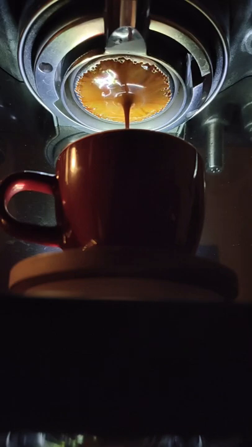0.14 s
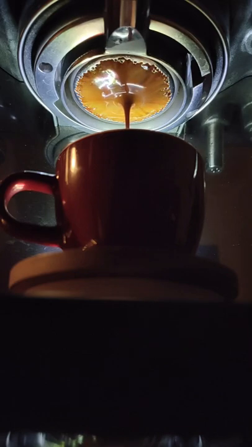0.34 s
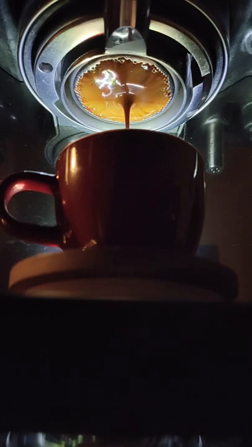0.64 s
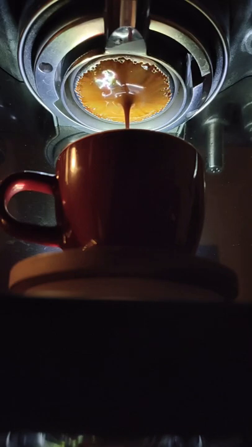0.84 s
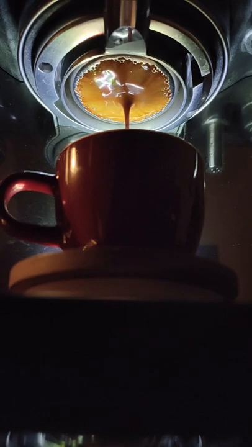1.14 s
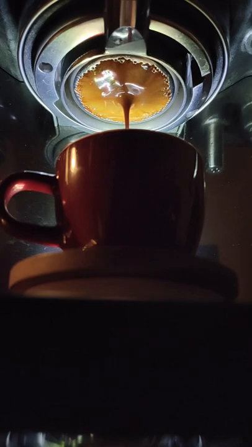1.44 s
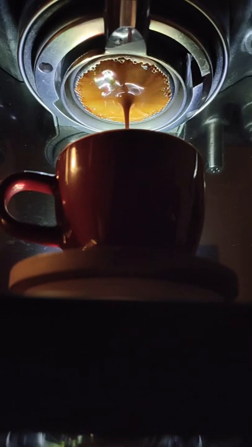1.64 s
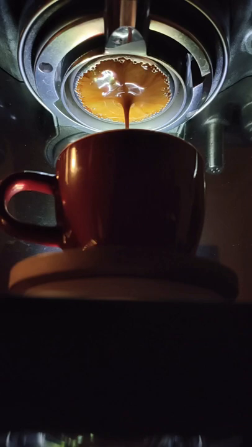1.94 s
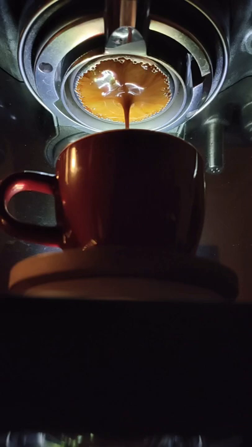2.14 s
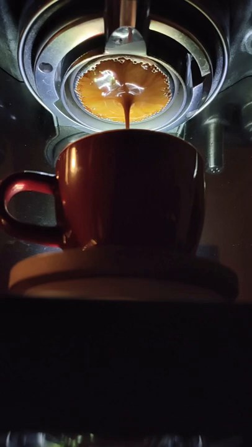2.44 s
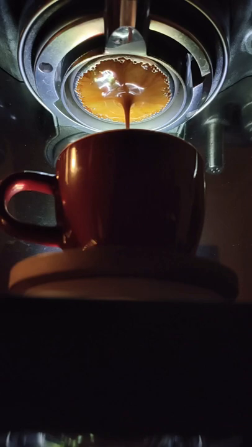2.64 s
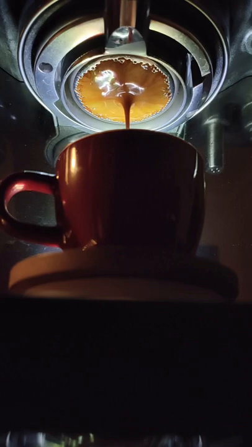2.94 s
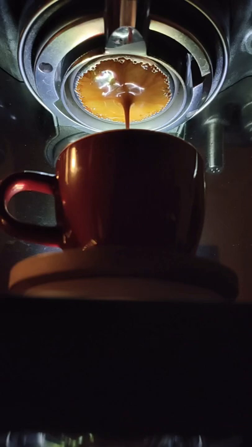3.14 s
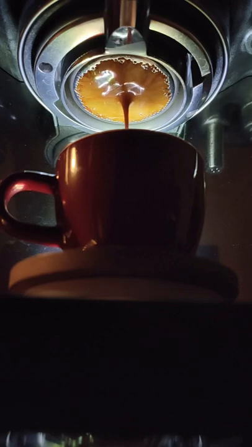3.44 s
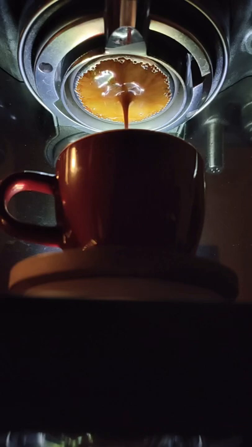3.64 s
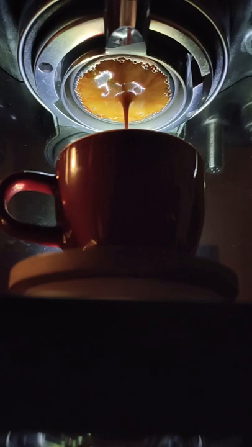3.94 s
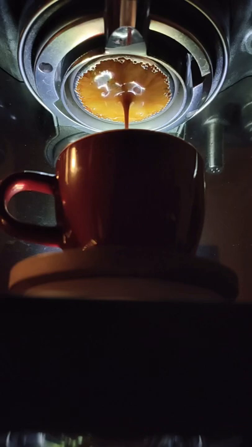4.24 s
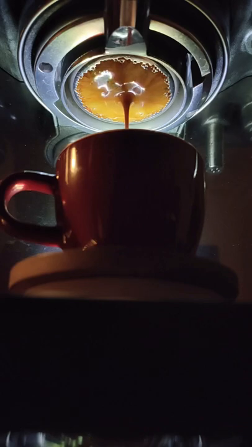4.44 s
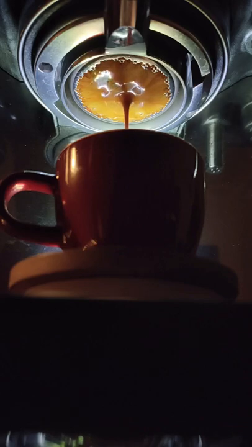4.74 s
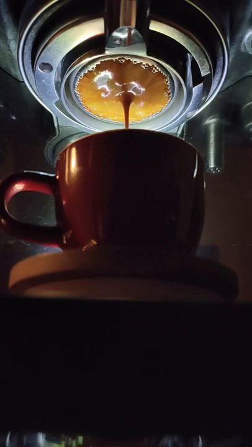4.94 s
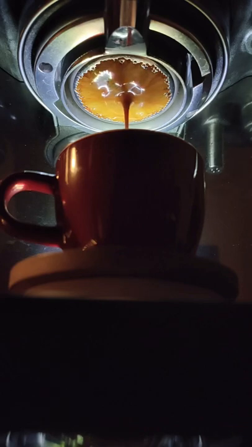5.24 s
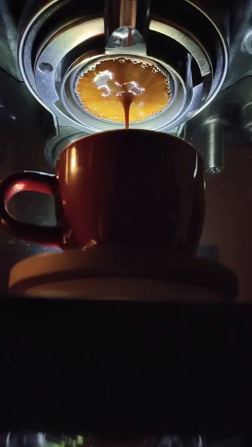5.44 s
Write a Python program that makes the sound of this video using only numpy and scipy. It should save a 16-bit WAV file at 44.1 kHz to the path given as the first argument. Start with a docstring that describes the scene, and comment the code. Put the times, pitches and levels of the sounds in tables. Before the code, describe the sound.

For about 5.6 seconds an espresso machine's vibrating pump runs continuously, heard close by in a kitchen through one microphone. Its hum is low and buzzy, about sixty strokes a second, with strong overtones up to several hundred hertz that waver slightly. Another motor's steady tone near 470 hertz beats quickly against it. Tiny valve ticks repeat every stroke, fusing into a metallic rattle, with bright hiss ringing mostly around two to four kilohertz. The hiss flickers, with brief surges near 0.8 and 1.7 seconds, smaller ones around 2.8 to 3.05, and a lift near 5.1. Sharp metallic knocks spit at about 3.4, 3.5 and 4.9 seconds. A thin coffee stream burbles into the cup, faint at first, swelling slightly near 2.1, then clearly growing from 3 seconds to a peak around 5.2. Soft casing and room rumble lies beneath; the pump never stops.

```python
"""A vibrating pump drives water through coffee in an espresso machine, heard close by in a kitchen.
Its piston strokes at mains rate: the casing hums in clean overtones, stops and valves tick at each stroke,
and noise bursts and steady hiss ring the metal body as water is forced through. Three lone knocks spit.
A stream of dense random splashes rings the air in the cup; a slower motor's steady tones drone nearby
over shaped noise, the rumble of casing and room. One microphone hears it all."""
import sys
import numpy as np
from scipy import signal
from scipy.fft import rfft, irfft, next_fast_len
from scipy.io import wavfile

SR = 44100
rng = np.random.default_rng(int(sys.argv[2]) if len(sys.argv) > 2 else 0)


def generate_wav(sig):
    """Save sig (samples, or channels by samples) to the path in sys.argv[1] as 16-bit PCM at SR."""
    pcm = np.round(np.clip(np.atleast_2d(sig).T, -1, 1) * 32767).astype(np.int16)
    wavfile.write(sys.argv[1], SR, pcm)


def invert_db(level):
    """Linear amplitude ratio for a level in decibels (20 dB per decade), elementwise."""
    return 10 ** (np.asarray(level, dtype=float) / 20)


N = 246959

MAINS_HZ = 59.992
# metal body rung by ticks, hiss and spits: centre_hz, width_hz, relative level_db
BODY_MODES = [(840, 145, -13), (1400, 205, -7.5), (1910, 360, -4), (2378, 210, -0.5), (2595, 157, -1),
              (3126, 230, -12.5), (3345, 86, -5.5), (3620, 59, -4), (3950, 184, -13), (5255, 304, -13),
              (6220, 460, -11.5), (7860, 390, -17), (8500, 230, -13), (9520, 420, -10), (10420, 780, -15.5),
              (12400, 1700, -29), (13900, 370, -25)]


def rms_one(x):
    """Scale to unit rms."""
    return x / np.sqrt(np.mean(x ** 2) + 1e-20)


def in_time(rows):
    """Columns of a curve table, one value per sample."""
    time_s, *columns = np.transpose(rows)
    return [np.interp(np.arange(N) / SR, time_s, column) for column in columns]


def bumps(rows, width_s):
    """Bell-shaped swells in dB at the given times."""
    t = np.arange(N) / SR
    return sum(db * np.exp(-0.5 * ((t - centre_s) / width_s) ** 2) for centre_s, db in rows)


def drift(rate_hz):
    """Slow random wander with spread 1: twice-smoothed noise, one value per 40 samples, joined by lines."""
    pole = np.exp(-80 * np.pi * rate_hz / SR)
    noise = rng.standard_normal(N // 40 + 2002)
    slow = signal.lfilter([1], [1, -2 * pole, pole * pole], noise)[2000:]  # skip the filter's start-up
    return np.interp(np.arange(N) / 40, np.arange(len(slow)), rms_one(slow))


def resonate(x, modes):
    """Parallel two-pole resonances of alternating sign, each wider one dying sooner."""
    out = np.zeros(N)
    for k, (hz, width_hz, db) in enumerate(modes):
        radius = np.exp(-np.pi * width_hz / SR)
        b = (1 - radius * radius) / 2 * np.array([1, 0, -1])
        a = [1, -2 * radius * np.cos(2 * np.pi * hz / SR), radius * radius]
        out += (-1) ** k * invert_db(db) * signal.lfilter(b, a, x)
    return out


def hum(push_ms, smear, lead, waver_db):
    """Overtones of the stroke; the casing smears the low ones in time, and higher ones waver more."""
    # casing hum, 1st to 9th multiple of the stroke rate: first_db, last_db (rms)
    low_overtones = [(-46, -45.5), (-52.5, -51.5), (-44, -42), (-47, -45), (-40.5, -42), (-49, -51.5),
                     (-49.5, -53), (-46.5, -42), (-50.5, -51)]
    # the 10th multiple takes over from the 11th: time_s, tenth_db, eleventh_db (rms)
    handover = [(0, -67, -57.5), (.9, -66, -53.5), (2.4, -59, -55), (3.6, -54.5, -57), (4.4, -50, -71),
                (5.6, -53, -72)]
    # casing buzz, 12th multiple and up: level_db (rms)
    buzz = [-66, -67, -69.5, -73.5, -84, -76.5, -95, -74.5, -72.5, -66, -77.5, -87.5, -70, -72, -72.5, -84,
            -82, -80, -75.5, -77, -82, -82, -94, -85, -75.5, -71.5, -75.5, -81.5, -69, -72.5, -76]
    # the 8th multiple dips as the 10th swells: centre_s, depth_db
    dropouts = [(.5, 20), (1.17, 9), (2.4, 6), (3.2, 6.0)]
    tenth_share = 0.64  # the 10th swells by this share of the depth
    in_step_above = 8  # overtones above this multiple keep in step with the push

    levels = [np.linspace(first, last, N) for first, last in low_overtones]
    levels += in_time(handover) + list(buzz)
    dropout_db = bumps(dropouts, width_s=0.1)
    levels[7] = levels[7] - dropout_db
    levels[9] = levels[9] + tenth_share * dropout_db

    turn = 2 * np.pi * MAINS_HZ * (np.arange(N) / SR - push_ms / 1000)
    out = np.zeros(N)
    for k, db in enumerate(levels, 1):
        loose = np.tanh(k / 10)
        waver = waver_db * loose * drift(1.87)
        phase = k * turn + smear * min(k, in_step_above) ** 2 + lead
        phase = phase + 0.71 * loose * drift(2.6)
        out += invert_db(db + waver) * np.cos(phase)
    return np.sqrt(2) * out


def ticks(jitter_us, uneven_db, dull_hz, burst_ms):
    """Every contact clicks once a stroke, nearly on time; its bright share opens a short gate for the hiss."""
    # contacts within one stroke: delay_ms, relative level_db, brightness (0-1)
    contacts = [(1.25, -3.5, 1), (7.9, -5.5, 0.08), (14.1, -6.5, 0), (14.9, -5, 0.99), (16.55, -7.5, 1)]
    starts_s = np.arange(-1, N / SR * MAINS_HZ) / MAINS_HZ
    sharp, soft = np.zeros(N + 1), np.zeros(N + 1)
    for delay_ms, db, bright in contacts:
        chance = rng.standard_normal((len(starts_s), 2))
        at = (starts_s + delay_ms / 1000 + jitter_us * 1e-6 * chance[:, 0]) * SR
        inside = (at >= 0) & (at < N - 1)
        size = invert_db(db + uneven_db * chance[:, 1])[inside]
        at = at[inside]
        i, share = at.astype(int), np.clip(bright, 0, 1)
        # split each click over two samples to place it between them
        for offset, weight in ((0, 1 - at % 1), (1, at % 1)):
            sharp[i + offset] += share * weight * size
            soft[i + offset] += (1 - share) * weight * size
    sharp, soft = sharp[:N] + 1e-18, soft[:N] + 1e-18
    dulled = signal.sosfilt(signal.butter(2, dull_hz, fs=SR, output="sos"), soft)
    fade = np.exp(-1000 / (burst_ms * SR))
    gate = signal.lfilter([1], [1, -fade], sharp)
    return rms_one(sharp + dulled), gate


def valves(hiss_db):
    """Ticks, spurts of hiss after bright ticks and steady hiss ring the body; the top follows the flow most."""
    clicks, gate = ticks(jitter_us=18, uneven_db=1.5, dull_hz=3000, burst_ms=1.5)
    spurts = rms_one(gate * rng.standard_normal(N))
    # thin jets: no low end
    spurts = signal.sosfilt(signal.butter(2, 6000, "high", fs=SR, output="sos"), spurts)
    steady = rng.standard_normal(N) * invert_db(1.05 * drift(27))
    struck = invert_db(-6.5) * clicks + invert_db(-3.5) * spurts + invert_db(-3) * steady
    rung = rms_one(resonate(struck, BODY_MODES))
    lower = signal.lfilter(*signal.butter(1, 5000, fs=SR), rung)
    upper = rung - lower
    swing_db = hiss_db - np.mean(hiss_db)
    return invert_db(-58.5) * (invert_db(0.28 * swing_db) * lower + invert_db(1.02 * swing_db) * upper)


def flow():
    """The hiss curve in dB: slow changes of flow, short surges and a random flicker."""
    # course of the valve hiss, of which only the swing about its mean is heard: time_s, level_db
    hiss_course = [(0, -64.5), (.9, -66), (1.3, -63.5), (2.3, -66), (2.7, -62.5), (3.6, -61.5), (4.1, -63),
                   (4.95, -62.5), (5.07, -59), (5.6, -62)]
    # short surges, before the valves scale the swing: centre_s, rise_db
    surges = [(.77, 3.5), (1.71, 4), (2.84, 1), (3.05, 1)]
    return in_time(hiss_course)[0] + bumps(surges, width_s=0.025) + 1.17 * drift(5.3)


def spits():
    """Spits of air in the pump: each a lone sharp knock that rings the middle of the body."""
    # knocks: time_s, level_db (before a 29 dB lift and the ringing)
    air_spits = [(3.3757, -44), (3.5029, -46), (4.9202, -42)]
    knocks = np.zeros(N) + 1e-18
    for time_s, db in air_spits:
        knocks[round(time_s * SR)] = invert_db(db + 29)
    return resonate(knocks, BODY_MODES[2:11])


def stream(cup_db):
    """The thin stream lands in dense tiny splashes; small bubbles burble and the air in the cup rings."""
    # air resonances of the cup: centre_hz, width_hz, relative level_db
    cup_modes = [(780, 370, -10.5), (1384, 195, 2.5), (1670, 330, -3.5)]
    sizes = rng.choice([-1, 1], N) * invert_db(2.5 * np.minimum(rng.exponential(1, N), 3))
    splashes = (rng.random(N) < 2500 / SR) * sizes  # about 2500 a second
    burble = np.zeros(N)
    for k, bubble_hz in enumerate(np.geomspace(650, 1900, num=24)):
        shifted = np.roll(splashes, 997 * k) + 1e-18  # each bubble pitch gets its own timing
        burble += invert_db(2.3 * drift(9)) * resonate(shifted, [(bubble_hz, 45, 0)])
    poured = rms_one(burble) + 0.79 * rms_one(splashes)
    return invert_db(cup_db - 2.5) * rms_one(resonate(poured, cup_modes))


def drone():
    """Slower motor and other steady tones off the mains grid; the strongest beats against the 8th overtone."""
    # steady tones: pitch_hz, level_db (rms)
    tones = [(470.07, -51), (705.1, -72), (763.9, -72), (881.4, -77), (555.8, -60), (524.2, -63),
             (40.4, -72)]
    t = np.arange(N) / SR
    out = np.zeros(N)
    for k, (hz, db) in enumerate(tones):
        level = np.sqrt(2) * invert_db(db + 0.6 * drift(1.2))
        out += level * np.sin(2 * np.pi * hz * t + 0.08 * drift(1.1) + k)
    return out


def rumble():
    """Rumble of casing and room: smooth noise between the overtones, shaped in its spectrum."""
    # noise spectrum: frequency_hz, density_db (per Hz)
    spectrum = [(20, -91), (38, -80), (75, -85.5), (125, -76.5), (160, -75), (205, -73), (240, -81),
                (270, -72), (300, -81.5), (400, -78.5), (510, -72.5), (600, -77), (800, -91), (1050, -97.5),
                (3000, -104), (15000, -125)]
    size = next_fast_len(N)
    hz, db = np.transpose(spectrum)
    bins_hz = np.arange(size // 2 + 1) * SR / size
    shape_db = np.interp(np.log(bins_hz + 1), np.log(hz), db)
    noise = rfft(rng.standard_normal(size))
    return irfft(noise * invert_db(shape_db) * np.sqrt(SR / 2), size)[:N]


def scene():
    """All sources reach one microphone."""
    # the stream grows louder as the cup fills: time_s, level_db (before a 2.5 dB cut)
    cup_course = [(0, -59), (.95, -57), (1.7, -58.5), (2.15, -55), (2.55, -57.5), (3.9, -53.5),
                  (4.5, -50.5), (5.05, -50), (5.2, -48.5), (5.6, -50.5)]
    pump = hum(push_ms=15.09, smear=0.5784, lead=1.09, waver_db=1.1) + valves(flow()) + spits()
    return (pump + stream(*in_time(cup_course)) + drone() + rumble())[None]


def low_pass(x):
    """Removes everything above the highest recorded frequency."""
    return signal.sosfilt(signal.butter(12, 15340, fs=SR, output="sos"), x)


def record(dry):
    """The microphone rolls off at the very top."""
    heard = signal.sosfilt(signal.butter(4, 14300, fs=SR, output="sos"), dry)
    return low_pass(heard)


dry = scene()
out = record(dry)
generate_wav(out)
```